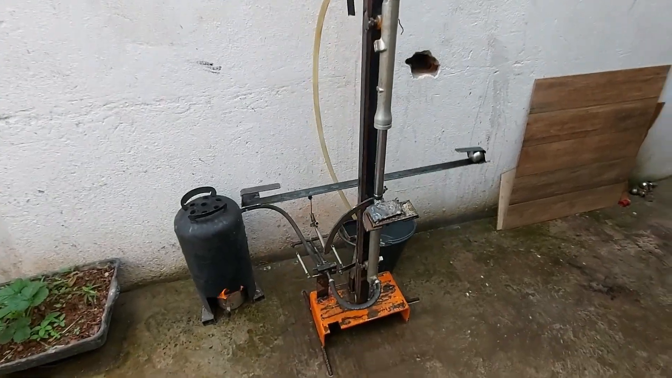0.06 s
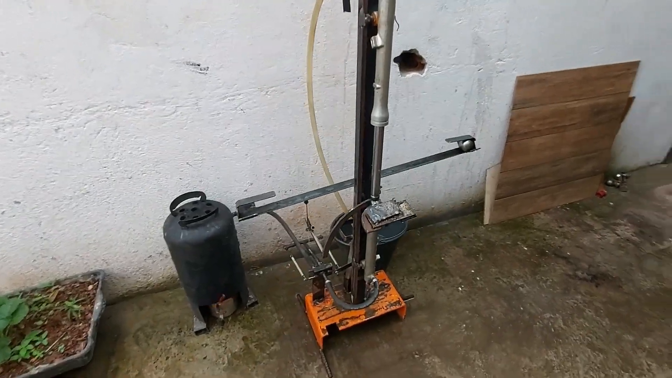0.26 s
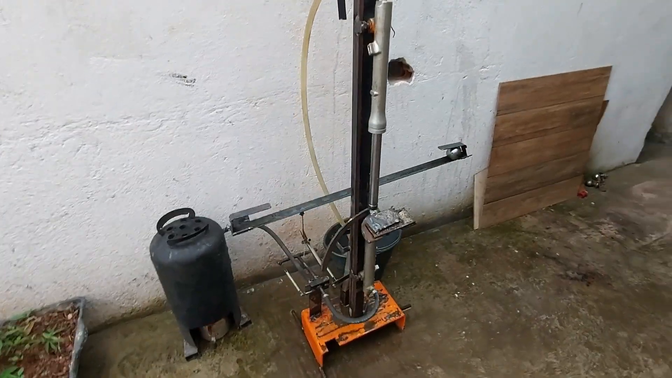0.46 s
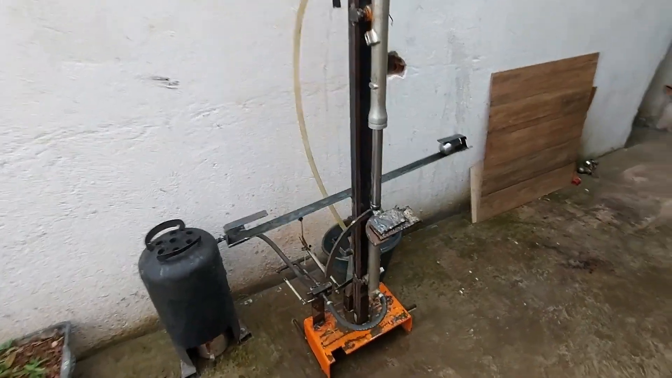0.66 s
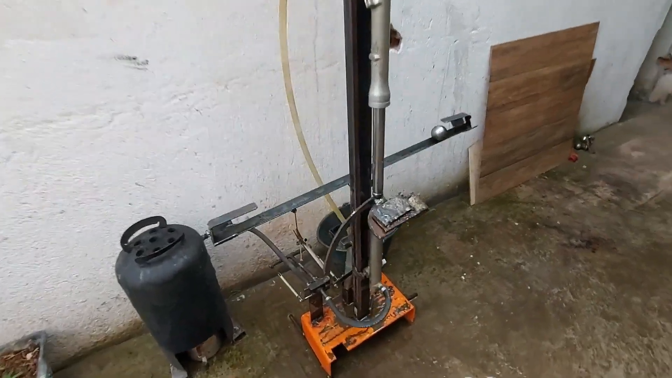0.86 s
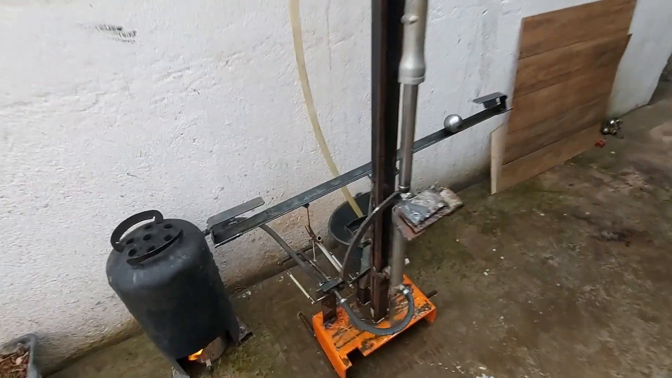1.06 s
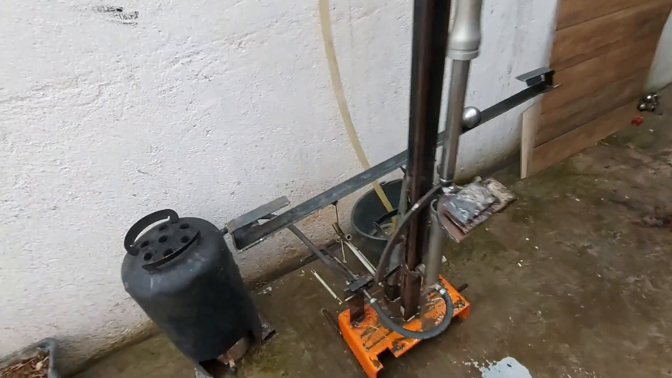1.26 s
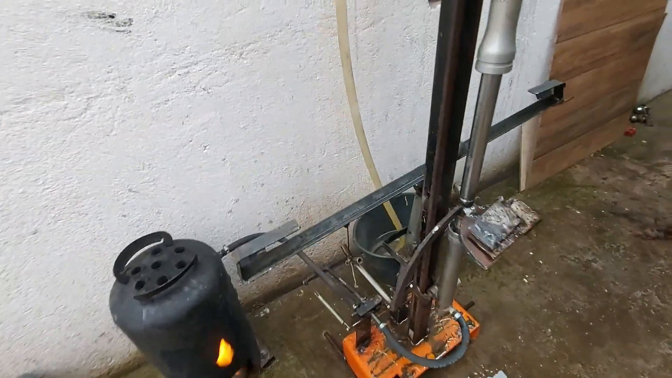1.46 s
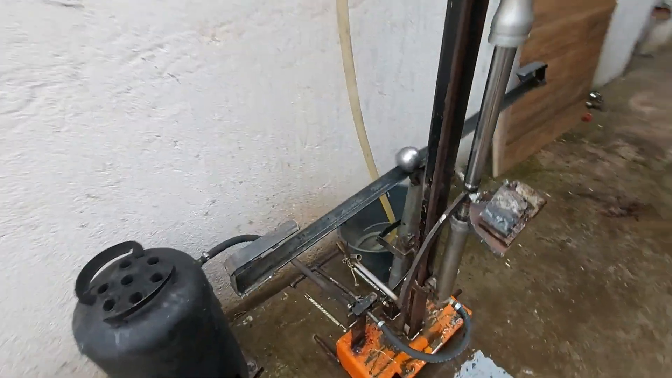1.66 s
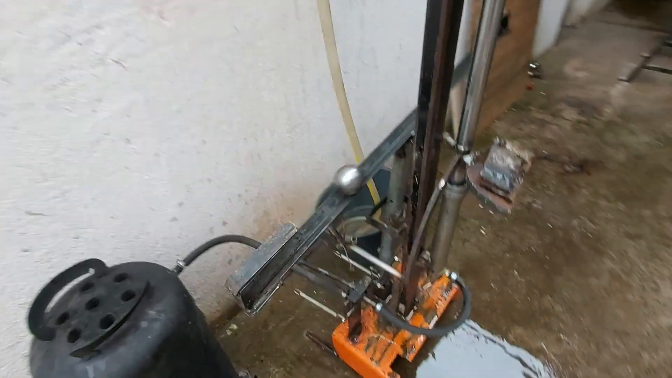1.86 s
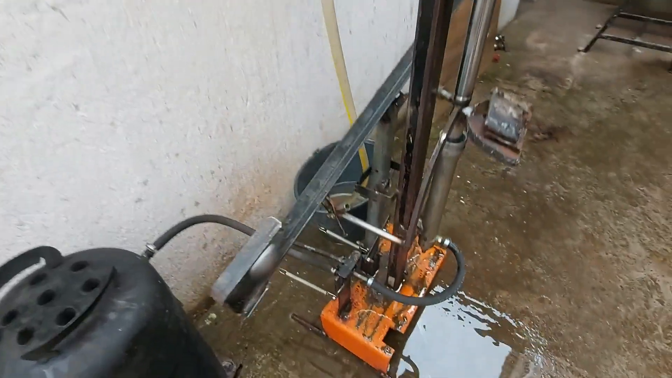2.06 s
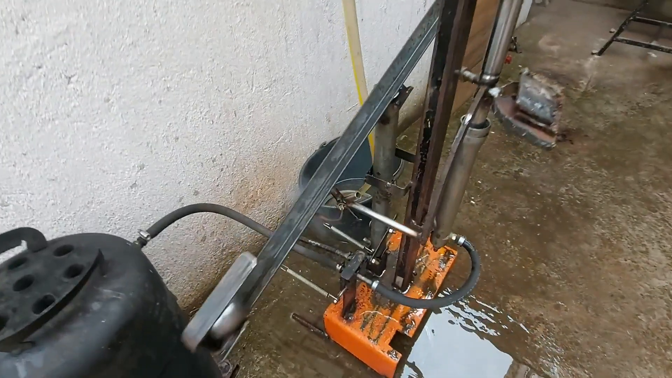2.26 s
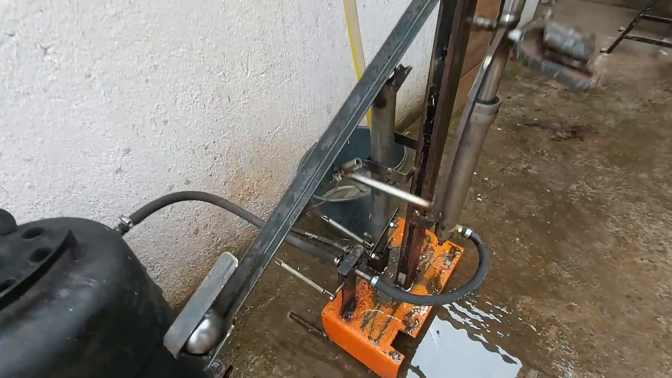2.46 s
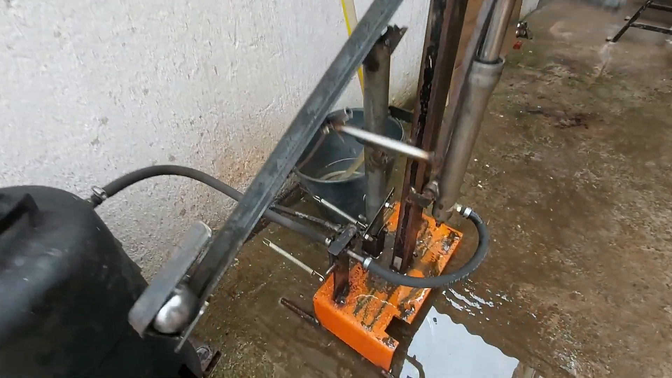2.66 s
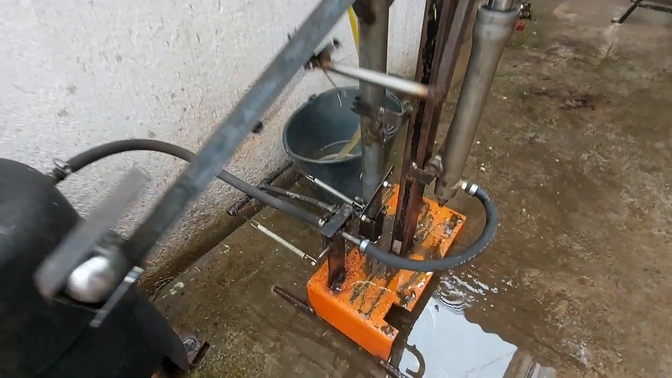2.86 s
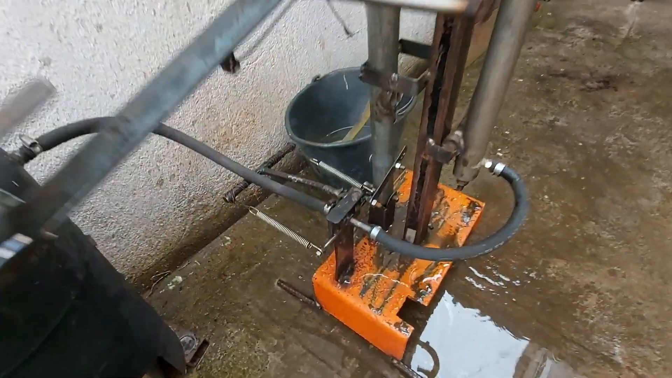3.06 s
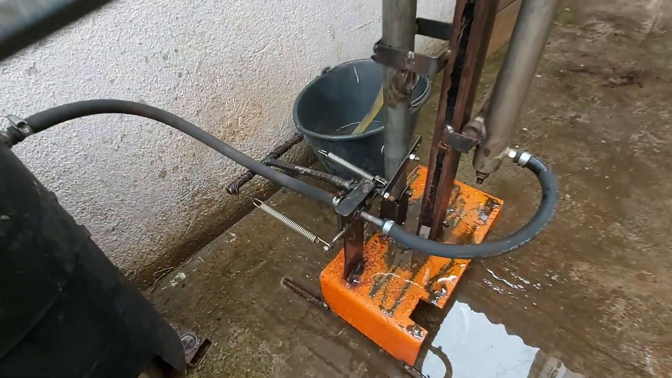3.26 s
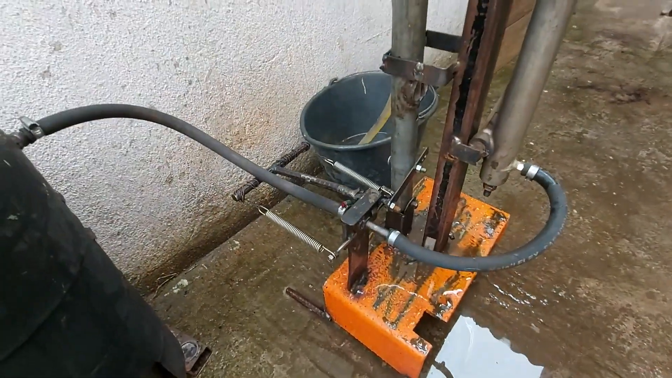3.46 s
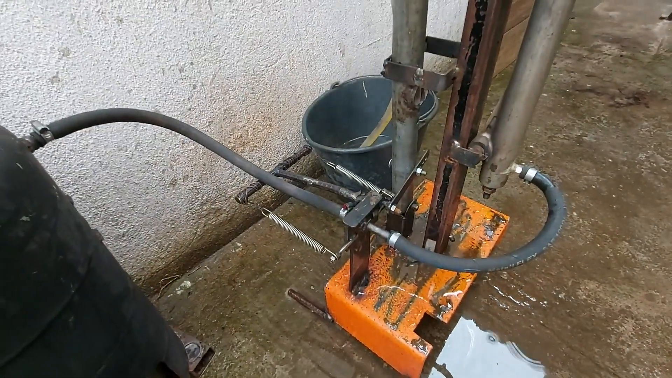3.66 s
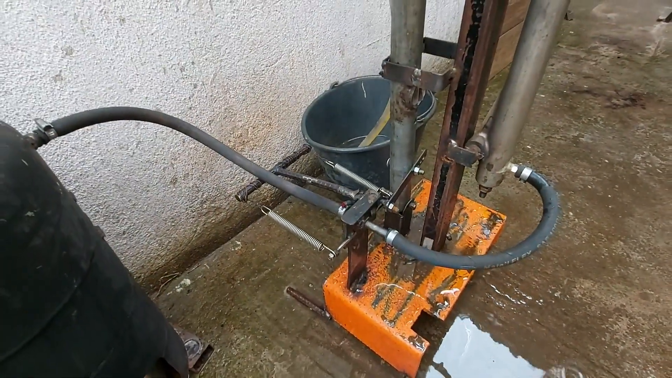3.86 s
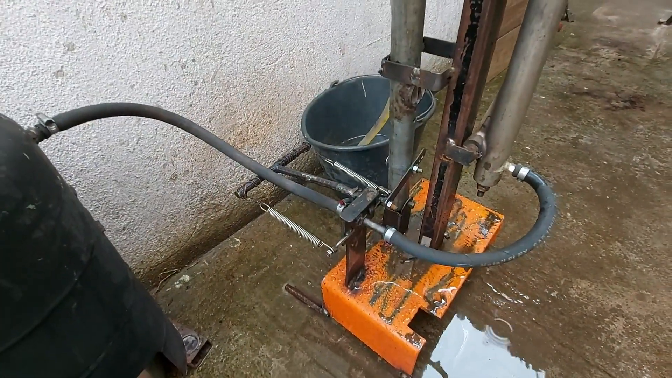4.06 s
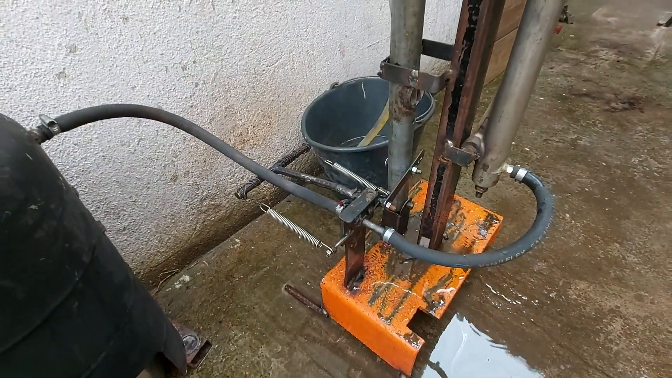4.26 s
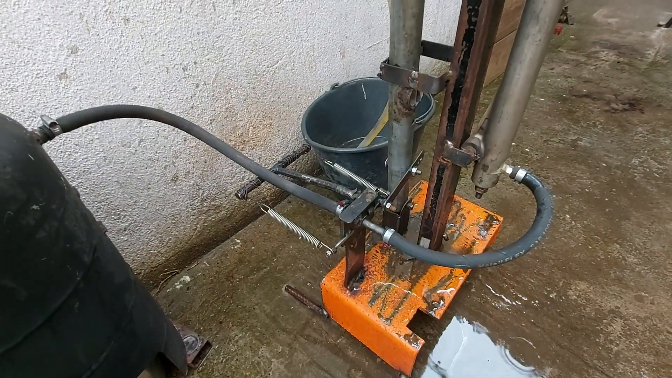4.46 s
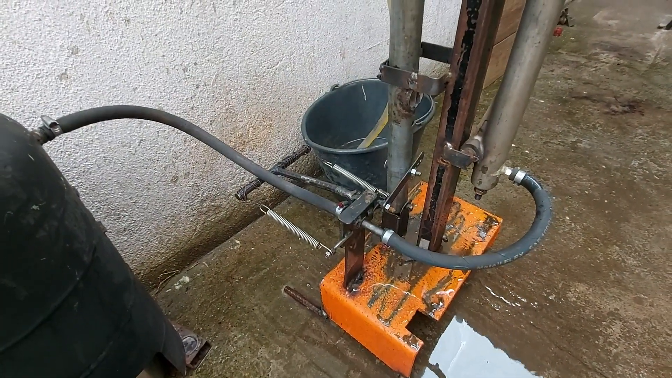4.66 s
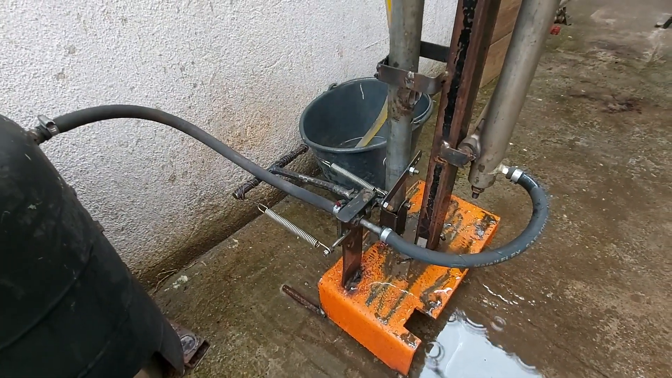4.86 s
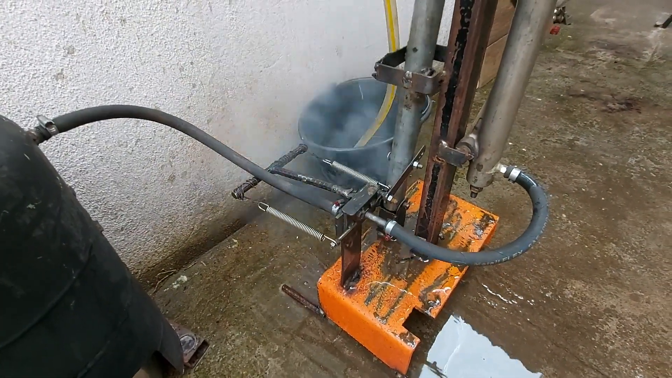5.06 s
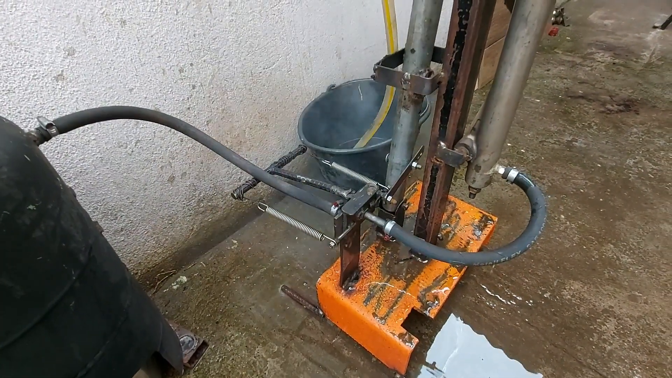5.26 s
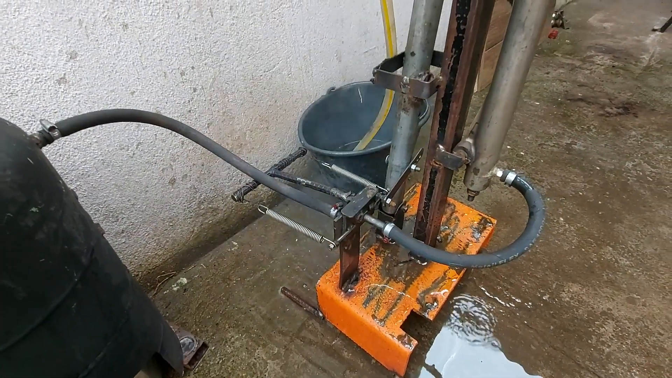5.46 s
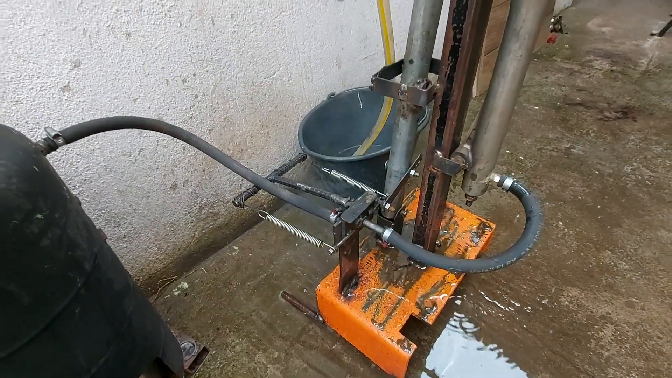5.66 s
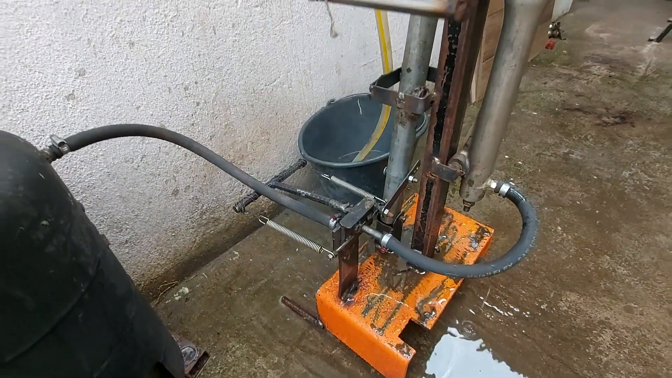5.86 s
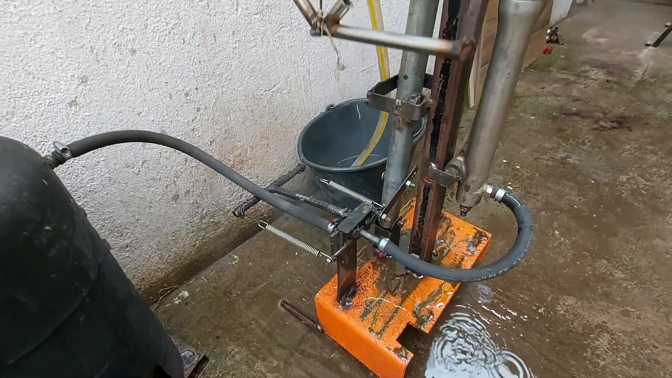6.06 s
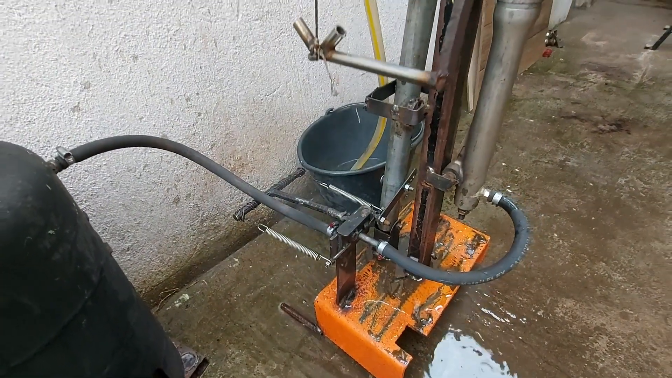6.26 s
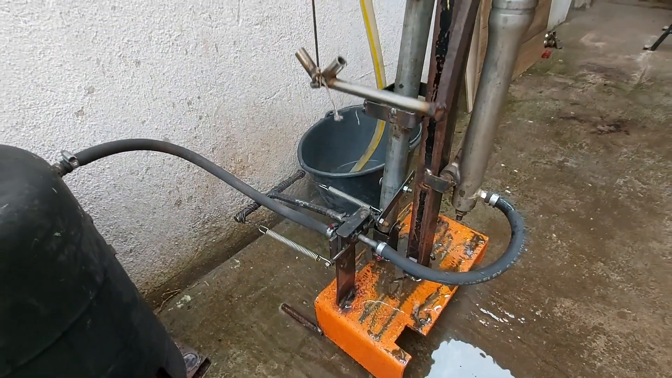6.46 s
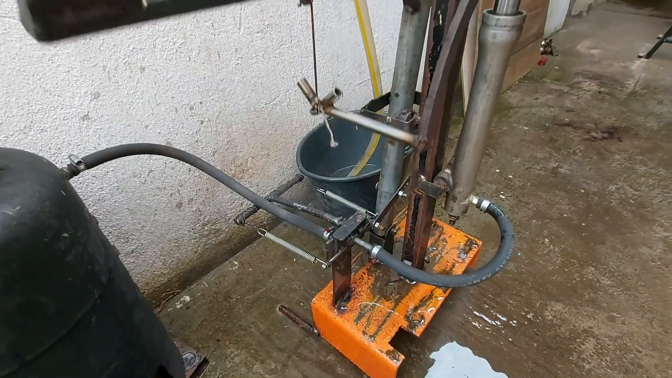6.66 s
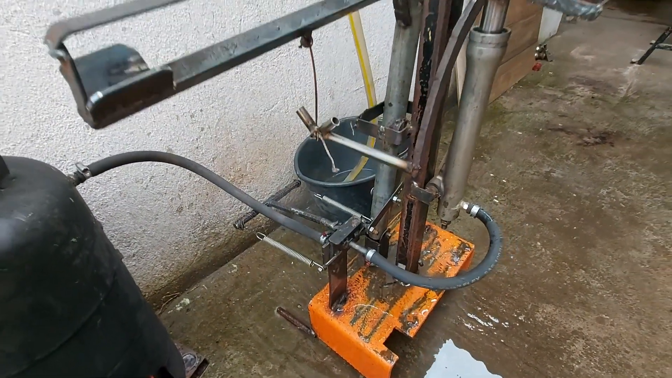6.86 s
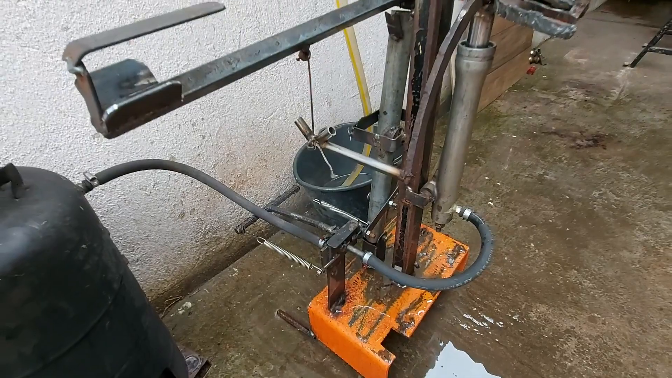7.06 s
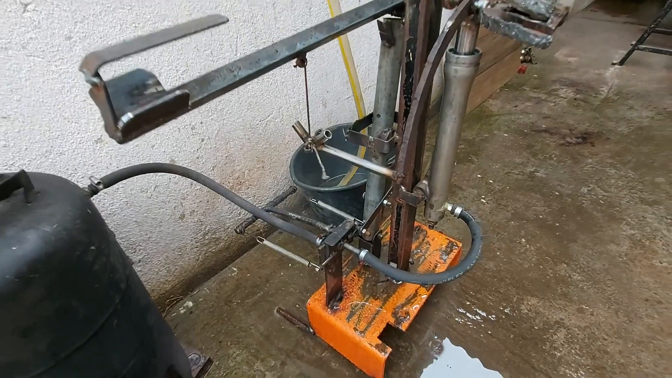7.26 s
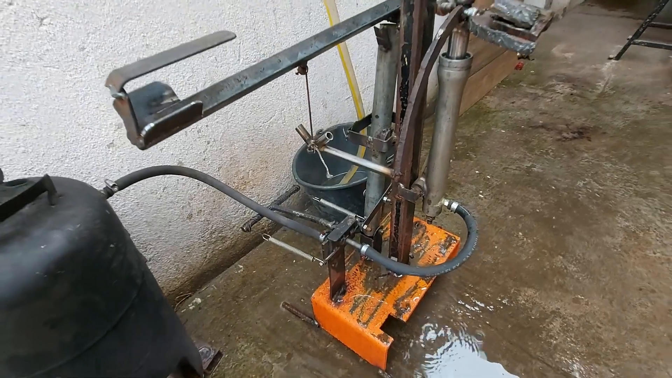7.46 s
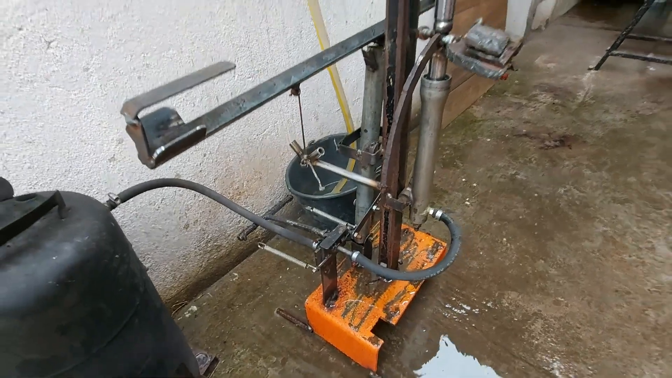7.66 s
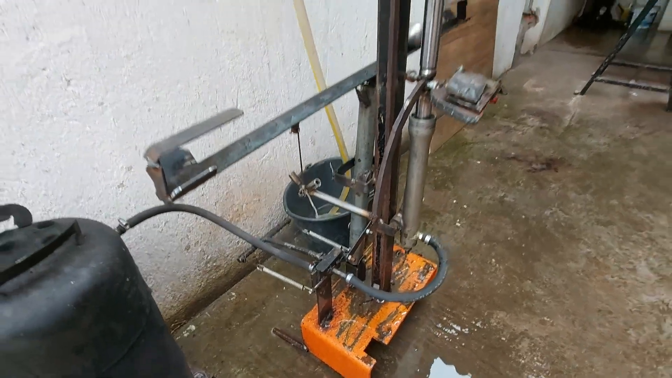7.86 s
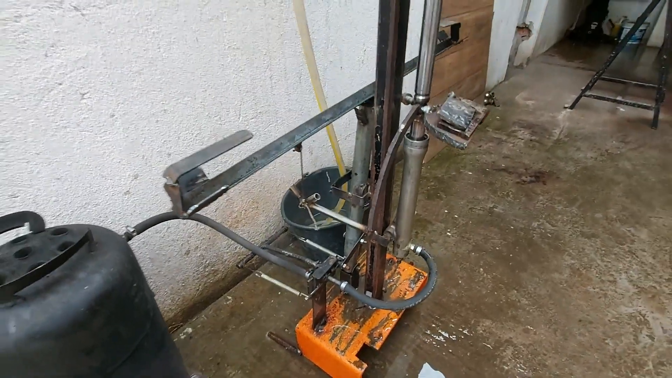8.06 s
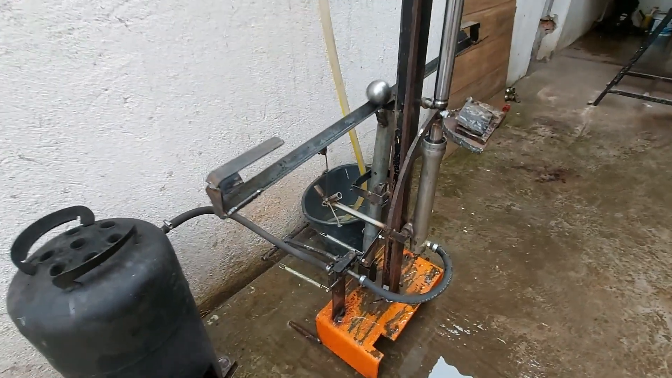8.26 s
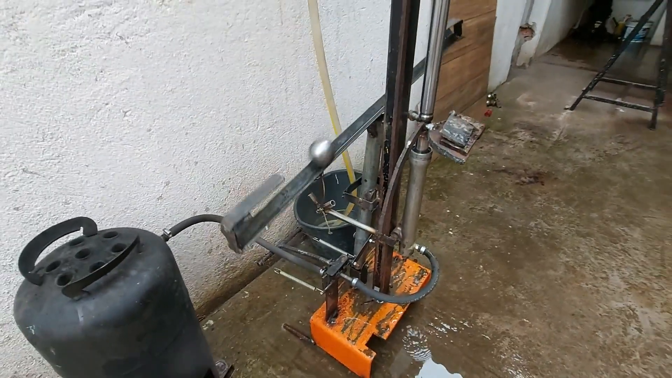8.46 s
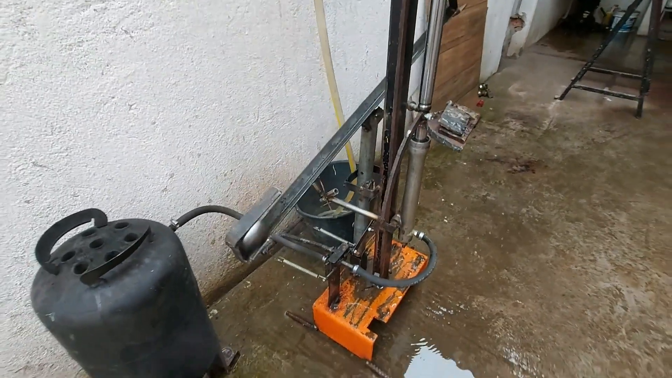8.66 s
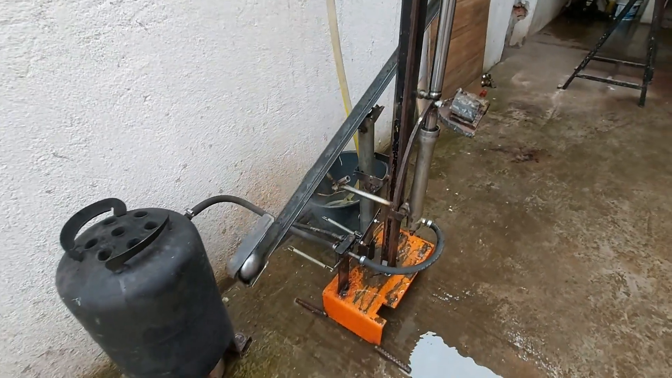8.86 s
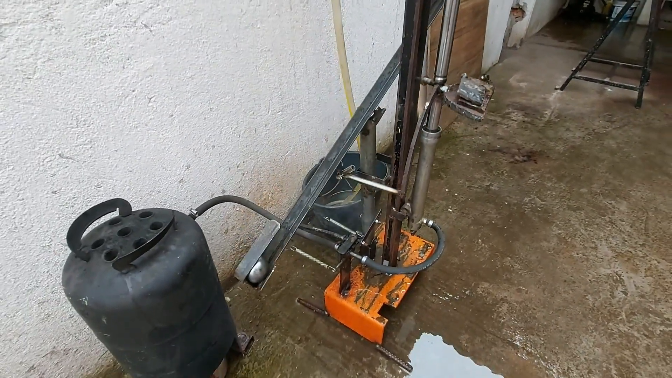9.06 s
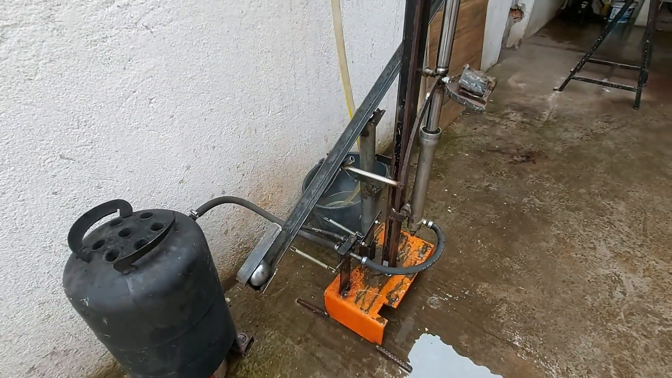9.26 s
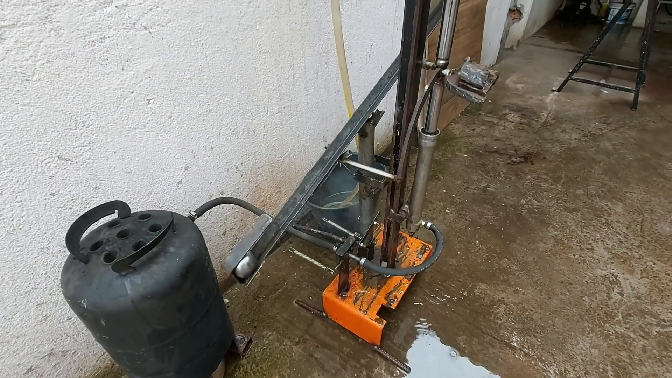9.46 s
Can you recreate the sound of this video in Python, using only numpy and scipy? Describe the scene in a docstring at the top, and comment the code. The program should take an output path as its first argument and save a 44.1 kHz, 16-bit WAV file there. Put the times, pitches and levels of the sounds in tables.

```python
"""A homemade steam pump in a walled yard, heard through a close pair of microphone ports.
The yard, a low drone and leaking steam come first; then the steel beam tips with a clack and a steel ball
rolls along it faster and faster, to clank and rattle in the end cage.
Around the second of three strokes water spatters on wet concrete and the pump wheezes; the beam's end sings
up to an exhaust puff and rings on. The third run rolls and clanks like the others. Walls echo throughout."""
import sys
import numpy as np
from scipy import signal
from scipy.fft import rfft, irfft, next_fast_len
from scipy.io import wavfile
from scipy.ndimage import uniform_filter1d

SR = 44100
rng = np.random.default_rng(int(sys.argv[2]) if len(sys.argv) > 2 else 0)


def waveform_to_disk(signal):
    """Save audio, clipped to [-1, 1], as 16-bit WAV at the path in sys.argv[1]."""
    frames = np.transpose(np.atleast_2d(signal))
    scaled = np.clip(frames, -1, 1) * 32767
    samples = np.round(scaled).astype(np.int16)
    wavfile.write(sys.argv[1], SR, samples)


N = 419391
TIME = np.arange(N) / SR

# Table levels are relative: the functions may trim them. A t60 is the time to fall by 60 dB.
# Brightness tilts the level from one register to the next: low, middle, high.

# Quiet yard around the machine. Each row: frequency in Hz, density in dB per Hz.
YARD_COLOUR = [(15, -14), (25, -17), (49, -17), (161, -3), (200, -19), (293, -11.5), (373, -13.5),
               (1230, -38.5), (1440, 10.5), (1560, 10.5), (4740, -0.5), (8140, -29.5), (16000, -25)]
YARD_DB = -78.5

# Low drone of the frame, swelling as the ball rolls.
# Each row: start in seconds, length in seconds, level near 60 Hz in dB, level near 110 Hz in dB.
DRONES = [(0.54, 1.76, -73.5, -68), (3.698, 1.5, -76.5, -73), (7.397, 1.7, -69, -74)]
DRONE_RISE_S, DRONE_T60_S = 0.24, 2.3

# Steam leaking at the valve. Each row: time in seconds, level in dB.
LEAK = [(0, -66.5), (.24, -67), (2.7, -62), (3.2, -63.5), (3.76, -60), (5.6, -71.5), (6.83, -66),
        (7.8, -61), (9.5, -62)]
# Colour of all the steam. Each row: frequency in Hz, density in dB per Hz.
STEAM_COLOUR = [(300, -5.5), (1000, -10), (2200, -9.5), (2800, -9), (4000, -1), (8000, -7.5), (10000, 1.5),
                (14000, -1.5), (16000, -4)]
# Strokes of the piston. Each row: start in seconds, level of the steam spurts in dB.
STROKES = [(.295, -58.5), (3.83, -52), (6.905, -52.5)]
SPURT_EVERY_S, SPURT_FADE_DB_PER_S = 0.1283, 7
EXHAUST_S, EXHAUST_DB, EXHAUST_RISE_S, EXHAUST_HOLD_S, EXHAUST_T60_S = 4.96, -27, 0.03, 0.04, 0.44

# Steel striking the channel.
# Each row: start in seconds, level in dB, brightness in dB, time rebounding in seconds, chatter t60 in seconds.
KNOCKS = [(.248, -49, -4.5, 0, 0.95), (.289, -38, 1.5, 0.019, 0.3), (0.774, -58.5, -10.5, 0, .26),
          (1.033, -44, -4.5, 0.0081, 0.21), (1.315, -39.5, 1.5, 0.0054, 0.073),
          (2.049, -38, 2.5, 0.038, 0.27), (2.16, -29, 9, 0, 0.12), (2.186, -28.5, -1, 0.0027, 0.083),
          (2.379, -33.5, 7.5, 0.086, 0.21), (2.422, -31, 2.5, 0.0055, .08),
          (2.664, -45.5, 6, 0.00032, 0.065), (2.76, -69, -11, 0.027, 0.17),
          (2.795, -42.5, 5.5, 0.0084, 0.065), (2.97, -59.5, 3, 0, 0.19), (3.005, -66, -12.5, 0.0011, .1),
          (3.779, -45.5, -3.5, 0.032, 0.18), (3.828, -38.5, 3.5, 0.027, 0.1), (4.961, -36, -8, 0, 0.2),
          (5.0, -35.5, -2.5, 0.042, 0.098), (5.121, -32.5, 3, 0.055, 0.49), (5.535, -62, -12, 0.0028, 0.11),
          (5.664, -61.5, -5.5, 0.014, 0.03), (6.847, -43.5, -2.5, 0.02, 0.29),
          (6.887, -32.5, 5, 0.025, 0.24), (7.467, -59.5, -14, 0.0044, 0.25),
          (7.627, -56.5, -5, 0.045, 0.19), (7.847, -41.5, -1.5, 0.053, 0.34),
          (8.121, -40.5, -1, 0.0033, .15), (8.635, -28.5, 3, 0.0057, 0.11), (8.733, -28.5, 5, 0.0039, 0.16),
          (8.758, -38, 1, 0.033, 0.22), (8.954, -32, 8.5, 0.065, 0.16), (9.031, -32.5, 6.5, 0.016, 0.052),
          (9.361, -47, 3.5, 0.0094, 0.051)]
# Strong modes of the channel. Each row: frequency in Hz, width in Hz, level in dB.
RAIL_MODES = [(1477, 30, 4), (1730, 70, -6), (1905, 45, -2), (2890, 110, -5), (3420, 49, 0), (3590, 30, -3),
              (3810, 45, -3), (3920, 48, -6), (4360, 45, 0), (4510, 30, 0), (4940, 63, -1), (5230, 45, -1),
              (5540, 35, -2), (5630, 38, 0), (5960, 60, -4), (6060, 40, -3), (6460, 110, -7),
              (6700, 120, -8), (7030, 86, -8), (7620, 150, -9), (8050, 37, -11), (8380, 28, -8),
              (9030, 35, -5), (9190, 54, 0), (9490, 160, -2), (9780, 48, -3), (9990, 37, -3),
              (10400, 140, -5), (11400, 260, -5), (12000, 33, -4), (12700, 120, -7), (13200, 69, -9),
              (13800, 50, -11), (14200, 49, -8), (15200, 83, -11), (15500, 65, -13)]
# Bending of the whole beam. Each row: frequency in Hz, width in Hz, level in dB.
BEAM_MODES = [(105.8, 0.8, -9.5), (297.7, 22, -5.5), (383, 3.3, 1.5), (4670, 17, -18.5)]
# The channel's many weaker modes. Each row: frequency in Hz, strength in dB.
RAIL_COLOUR = [(60, -22), (200, -17.5), (380, -10), (600, -7.5), (850, -6.5), (1500, -1.5), (1900, -2.5),
               (2450, -7.5), (3000, -4), (4000, -1.5), (5200, -9), (6700, -19.5), (8000, -11.5),
               (10000, -6), (12500, -7), (14000, -14.5), (16000, -22.5)]
# Edges of the low, middle and high register, in Hz.
REGISTER_EDGES_HZ = [0, 2300, 6500, 20000]
MIDDLE_DB = 2.5  # every contact favours the middle register

# Frame jolted by the tipping beam and the ball. Each row: start in seconds, level in dB, hold in seconds.
JOLTS = [(.249, -60, 0.0074), (2.05, -39, 0.021), (3.781, -42, 0.0029), (4.962, -34.5, .005),
         (6.848, -46, 0.004), (8.634, -40, 0.0099)]
# Colour of the jolts. Each row: frequency in Hz, density in dB per Hz.
JOLT_COLOUR = [(25, -13), (160, -6.5), (280, -6.5), (420, 3.5), (800, -5.5), (1100, -8), (2500, -20)]

# Single modes that a blow leaves singing.
# Each row: start in seconds, frequency in Hz, level in dB, time kept up by chatter in seconds, t60 in seconds.
OVERTONES = [(.249, 1915, -50, .02, .2), (.249, 4220, -50, .015, .2), (.29, 1915, -45, .095, .1),
             (2.158, 4508, -41, 0, .45), (2.158, 5630, -37, .012, .1), (2.158, 6066, -39, .012, .1),
             (2.22, 5626, -42, .06, .3), (2.22, 4932, -44, .05, .3), (2.381, 4508, -44, .03, .4),
             (2.381, 6066, -44, .05, .4), (2.381, 9195, -36, 0, .4), (2.381, 11965, -36, 0, .35),
             (2.797, 1750, -54, 0, .25), (2.797, 6600, -47, 0, .13), (3.781, 2400, -48, 0, .25),
             (4.961, 4354, -41, 0, .6), (5.121, 4932, -41, 0, .5), (5.538, 2169, -72, 0, .9),
             (6.848, 382, -59.5, 0, 1.4), (6.89, 1905, -47, 0, .65), (6.89, 3806, -42, .02, .25),
             (6.89, 5669, -41, .02, .22), (6.89, 5970, -41, .02, .24), (7.13, 1476, -58, .02, .3),
             (8.732, 4508, -37, .008, .12), (8.76, 5626, -40, .06, .3), (8.98, 6066, -42, .06, .4),
             (9.03, 3406, -42, .02, .45), (9.03, 382, -60, 0, 1.4)]

# Swells of scraping and rattling contact on the steel.
# Each row: time of the crest in seconds, level in dB, brightness in dB.
SCRAPES = [(.39, -55, 0), (.46, -61, 1), (.94, -55.5, -3.5), (1.21, -43.5, -2.5), (1.395, -41.5, -1),
           (1.636, -45, -2.5), (1.812, -44.5, 4.5), (2.246, -37, 8), (3.958, -45.5, 3), (4.331, -42, 3),
           (4.527, -32.5, 3.5), (4.681, -35, 1.5), (4.776, -42, 2), (4.889, -34.5, 2.5), (7.504, -48, -1.5),
           (7.975, -46, 3.5), (8.239, -41, -1.5), (8.359, -42.5, 1), (8.43, -36, 2), (8.63, -40, -2.5),
           (8.82, -34, 5.5), (9.0, -38.5, 3.5), (9.08, -42.5, 4.5)]
SCRAPE_WIDTH_S = 0.021

# Runs of the ball. Each row: start in seconds, time to reach the cage in seconds, time rattling in it in
# seconds, level at full speed in dB, brightness in dB, rattle level in dB.
ROLLS = [(0.728, 1.463, 0.35, -38.5, -1, -39), (3.82, 1.109, 0.33, -37, 1.5, -40),
         (7.36, 1.28, .5, -44.5, -1.5, -40.5)]
SPEED_POWER, SLOW_DULLS_DB = 1.22, 5  # loudness grows as a power of speed; a slow ball sounds dull
# in the cage the rumble gives way to a bright rattle
RATTLE_BRIGHT_DB, SETTLE_T60_S, HANDOVER_T60_S = 5, 0.34, 0.48

# Ball flying clear of the steel before a hard blow.
# Each row: landing in seconds, time in the air in seconds, gain of its rolling just before landing in dB.
FLIGHTS = [(2.379, 0.026, -8.5), (4.962, .038, -9.5), (5.121, .05, -0.5), (8.953, 0.03, -6)]

# Low blasts at each microphone port in the hardest clanks. Each row: start in seconds, level in dB, hold in seconds.
BLASTS = [(2.184, -31, 0.027), (2.219, -31.5, 0.029), (2.384, -24, 0.0041), (2.408, -29, .005),
          (2.426, -34.5, 0.047), (4.962, -33.5, .005), (4.995, -32.5, 0.017), (5.014, -27, 0.034),
          (5.123, -28, .007), (5.153, -29, 0.021), (8.76, -32, 0.021), (8.78, -31, 0.044),
          (8.982, -32.5, 0.017), (9.032, -29, 0.005)]
# Colour of the blasts. Each row: frequency in Hz, density in dB per Hz.
BLAST_COLOUR = [(25, -11), (55, 1), (110, 0.5), (160, -2), (200, -11), (290, -1.5), (400, -10),
                (650, -10.5), (1000, -17), (2500, -26.5)]

# Water drops slapping the concrete. Each row: start in seconds, level in dB, centre in Hz.
DROPS = [(3.0678, -41.5, 9600), (3.1016, -40, 11100), (3.111, -41, 4340), (3.1343, -37.5, 9400),
         (3.1781, -36.5, 6860), (3.1977, -32.5, 10400), (3.213, -45, 8000), (3.242, -50, 7000),
         (3.2873, -45, 10000), (3.311, -38, 9400), (3.4196, -42, 10600), (3.584, -48.5, 5030),
         (3.62, -46.5, 5100), (3.669, -38.5, 7400), (4.078, -33.5, 10400), (4.118, -28, 9700),
         (4.1678, -27, 10300)]

# Thin wheezy whistles.
# Each row: start in seconds, level in dB, middle pitch in Hz, length in seconds, glide in octaves per second.
WHEEZES = [(3.082, -60, 4160, .18, -1), (3.55, -65, 4020, 0.25, -1), (5.852, -71.5, 4170, 0.15, -1),
           (6.421, -69, 3960, 0.18, -1), (6.626, -71, 4900, .18, -.5), (7.165, -59, 4780, 0.093, 1.5),
           (7.185, -57.5, 4070, .24, -1)]

# Far end of the beam, singing up during the second run and then ringing on.
RING_HZ, RING_PEAK_S, RING_DB, RING_RISE_DB_PER_S, RING_T60_S = 1476, 5.08, -45.5, 16, 2.1

# Echo of the yard walls. Each row: frequency in Hz, t60 in seconds.
ECHO = [(100, 1), (400, 0.26), (1400, 0.78), (4000, 0.5), (8000, 0.4), (15000, 0.097)]
# Direction of the machine from the microphone. Each row: time in seconds, left minus right in dB.
BEARING = [(0, 2), (2.3, 2), (3.8, 5), (6.9, 2.5), (7.5, 3), (9, 3)]
# Close ports hear long waves alike. Each row: frequency in Hz, weight of their difference in dB.
WIDTH = [(60, -10), (400, -12), (800, -7), (1150, 0.5), (1500, 2.5), (2000, -2.5), (3000, -0.5), (16000, 0)]
# Unequal colour of the two ports. Each row: frequency in Hz, left minus right in dB.
PORTS = [(60, 0.5), (110, -1), (200, 1), (380, -1.5), (700, 1), (1290, -5), (2380, 0.5), (4400, -5),
         (8120, -1.5), (15000, -3)]
EDGE_HZ = 15900  # upper limit of the microphone's band


def gain_of(db):
    """Decibels to amplitude."""
    return 10 ** (np.asarray(db) / 20)


def evened(x):
    """Scales to an rms of one."""
    return x / np.sqrt(np.mean(x ** 2) + 1e-20)


def read(points, hz):
    """Reads a table on a log-frequency axis."""
    f, value = np.transpose(points)
    return np.interp(np.log(hz + 1), np.log(f + 1), value)


def level(rows):
    """Amplitude over time from a curve of seconds and dB."""
    return gain_of(np.interp(TIME, *np.transpose(rows)))


def swell(start, rise_s, hold_s, t60):
    """An envelope over the whole scene: a straight rise, full until hold_s after the start, then a decay."""
    t = TIME - start
    rise = np.clip(t / rise_s, 0, 1)
    return rise * gain_of(-60 * np.clip((t - hold_s) / t60, 0, 4))


def panned(db):
    """Left and right gains for a level difference."""
    return gain_of(np.array([[.5], [-.5]]) * db)


def add(mix, s, sound):
    """Mixes a sound in at a time."""
    part = mix[..., max(round(s * SR), 0):][..., :sound.shape[-1]]
    part += sound[..., :part.shape[-1]]


def noise(colour, shared):
    """Two channels of coloured noise with a share of their power in common."""
    size = next_fast_len(N, True)
    white = rng.standard_normal((3, size))
    pair = np.sqrt(shared) * white[2] + np.sqrt(1 - shared) * white[:2]
    weights = gain_of(read(colour, np.fft.rfftfreq(size, 1 / SR)))
    return evened(irfft(rfft(pair) * weights, size)[:, :N])


def band_noise(hz, width, size):
    """A short stretch of stereo noise in one resonance."""
    b, a = signal.iirpeak(hz, hz / width, fs=SR)
    return evened(signal.lfilter(b, a, rng.standard_normal((2, size))))


def slow_wander(first, second):
    """Noise smoothed by two running means, of so many samples each."""
    return evened(uniform_filter1d(uniform_filter1d(rng.standard_normal(N), size=first), size=second))


def yard_air():
    """The steady noise floor of the quiet yard."""
    return gain_of(YARD_DB) * noise(YARD_COLOUR, shared=0.17)


def drone(low_hz=61, high_hz=108, idle_db=-84, skirt_db=-13):
    """Two low resonances of the frame hum faintly and swell as the ball rolls."""
    drive = np.zeros((2, N))
    for s, length, *drones_db in DRONES:
        drive += gain_of(drones_db)[:, None] * swell(s, DRONE_RISE_S, length, DRONE_T60_S)
    out = np.zeros((2, N))
    for size, hz in zip(drive, (low_hz, high_hz)):
        hump = [(hz / 4, -60), (hz / 1.2, skirt_db), (hz, 0), (hz * 1.1, skirt_db), (hz * 4, -33), (hz * 20, -70)]
        out += np.hypot(gain_of(idle_db), size) * noise(hump, shared=0.29)
    return out


def steam(count=7):
    """Turbulent hiss of a leak that spurts evenly during each stroke, and of one exhaust puff."""
    puff = gain_of(EXHAUST_DB) * swell(EXHAUST_S, EXHAUST_RISE_S, EXHAUST_HOLD_S, EXHAUST_T60_S)
    flow = level(LEAK) + puff
    t = np.arange(0, count * SPURT_EVERY_S, 1 / SR)
    spurts = np.sin(np.pi * t / SPURT_EVERY_S) ** 2 * gain_of(-SPURT_FADE_DB_PER_S * t)
    for s, db in STROKES:
        add(flow, s + SPURT_EVERY_S / 2, gain_of(db) * spurts)
    return flow * noise(STEAM_COLOUR, shared=0.047)


def register_db(order, bright_db):
    """Level of the low, middle or high register (order 0, 1, 2) for a contact of some brightness."""
    return bright_db * (order - 1) - MIDDLE_DB * abs(order - 1)


def add_knocks(power, order, knock_db=-2.5, bite=0.76, bite_s=0.0066, rise_s=0.00033):
    """Blows on the channel add contact power that bites at once and then chatters away."""
    t = np.arange(SR // 2) / SR
    attack = np.minimum(t / rise_s, 1) * (1 + bite * np.exp(-t / bite_s))
    for s, db, bright_db, rebound_s, t60 in KNOCKS:
        fade_db = -60 * np.maximum(t - rebound_s, 0) / max(t60, .01)
        peak_db = db + knock_db + register_db(order, bright_db)
        add(power, s, (attack * gain_of(peak_db + fade_db)) ** 2)


def cracks(crack_db=1, rebound_db=-3, rebound_every_s=0.022):
    """The first touch of each blow lasts about a millisecond; long rebounds touch again."""
    out = np.zeros(N)
    for s, db, _, rebound_s, _ in KNOCKS:
        for k, touch in enumerate(rng.choice([-1, 1], size=(4, 48))):
            if k == 0 or k * rebound_every_s <= rebound_s:
                add(out, s + k * rebound_every_s, gain_of(db + crack_db + rebound_db * (k > 0)) * touch)
    return out


def rail_responses(dense_t60=0.07, count=4):
    """The channel's ring from a few contact points: strong modes over a short, dense clatter, by register."""
    t = np.arange(SR // 2) / SR
    bins = np.fft.rfftfreq(len(t), 1 / SR)
    hz, width, db = np.vstack([RAIL_MODES, BEAM_MODES]).T
    phases = np.exp(2j * np.pi * rng.random((count, 2, len(hz))))
    weights = gain_of(db) * 2 * np.pi * width / SR * phases
    # a wider mode dies sooner
    modes = rfft((weights @ np.exp(np.outer(2j * np.pi * hz - np.pi * width, t))).real)
    fade = gain_of(-60 * t / dense_t60)
    dense = rng.standard_normal((count, 2, len(t))) * fade
    # overlapping modes leave no deep gaps between them
    dense = irfft(np.exp(1j * np.angle(rfft(dense))), len(t)) * np.sqrt(fade)
    dense = rfft(dense / np.linalg.norm(dense, axis=-1, keepdims=True)) * gain_of(read(RAIL_COLOUR, bins))
    # fades out over the fourth fifth; the last fifth is silent
    whole = irfft(modes + dense, len(t)) * np.clip(4 - 5 * t / t[-1], 0, 1)
    responses = []
    for lo, hi in zip(REGISTER_EDGES_HZ, REGISTER_EDGES_HZ[1:]):
        sos = signal.butter(4, [lo + 40, hi], "band", fs=SR, output="sos")
        responses.append(evened(signal.sosfilt(sos, whole)) / np.sqrt(len(t)))
    return responses


def thuds(blows, colour, lowest_hz, fall_t60, thud_db, ragged_db):
    """Short bursts of low, shuddering noise, in gusts where ragged_db is above zero."""
    out, t = np.zeros((2, N)), np.arange(SR // 6) / SR
    sos = signal.butter(2, lowest_hz, "high", fs=SR, output="sos")
    shudder = signal.sosfilt(sos, noise(colour, shared=0))
    shudder = shudder * gain_of(ragged_db * slow_wander(260, 90))
    for s, db, hold_s in blows:
        shape = gain_of(-60 * np.maximum(t - hold_s, 0) / fall_t60)
        burst = shape * shudder[:, round(s * SR):][:, :len(t)]
        add(out, s, gain_of(db + thud_db) * evened(burst) * np.sqrt(np.mean(shape ** 2)))
    return out


def frame_jolts():
    """The frame shudders as it is jolted by the tipping beam and the ball."""
    return thuds(JOLTS, JOLT_COLOUR, lowest_hz=250, fall_t60=.1, thud_db=1, ragged_db=0)


def overtones(sing_db=1.4, waver_rad=0.62):
    """Lightly damped modes outlast the clatter, with a phase that wavers as the steel rattles on."""
    out, t = np.zeros((2, N)), np.arange(SR) / SR
    window = np.hanning(SR // 40)[None]
    for s, hz, db, hold_s, t60 in OVERTONES:
        waver = evened(signal.oaconvolve(rng.standard_normal((2, SR)), window, "same", axes=1))
        fade_db = -60 * np.maximum(t - hold_s, 0) / t60
        shape = np.minimum(t / .003, 1) * gain_of(db + sing_db + fade_db)
        add(out, s, shape * np.sin(2 * np.pi * hz * t + waver_rad * waver))
    return out


def add_scrapes(power, order, scrape_db=1.77):
    """Scraping and rattling on the steel adds contact power that swells and ebbs."""
    t = np.arange(SR // 2) / SR
    crest = np.exp(-((t - t.mean()) / SCRAPE_WIDTH_S) ** 2)
    for s, db, bright_db in SCRAPES:
        gain = gain_of(db + scrape_db + register_db(order, bright_db))
        add(power, s - t.mean(), crest * gain ** 2)


def rolling(order):
    """The ball speeds up evenly, growing louder and brighter, then rattles in the cage and settles."""
    power, t = np.zeros(N), np.arange(3 * SR) / SR
    for s, travel_s, rattle_s, db, bright_db, rattle_db in ROLLS:
        speed = np.minimum(t / travel_s, 1)
        caged_s = np.maximum(t - travel_s, 0)
        fade_db = -60 * caged_s / HANDOVER_T60_S
        settle_db = -60 * np.maximum(caged_s - rattle_s, 0) / SETTLE_T60_S
        tone_db = register_db(order, bright_db - SLOW_DULLS_DB * (1 - speed))
        rumble = speed ** SPEED_POWER * gain_of(db + fade_db + tone_db)
        rattle_tone_db = register_db(order, RATTLE_BRIGHT_DB)
        rattle = (caged_s > 0) * gain_of(rattle_db + settle_db + rattle_tone_db)
        add(power, s, rumble ** 2 + rattle ** 2)
    return np.sqrt(power)


def airborne():
    """Gain of the rolling contact: it drops while the ball flies towards a hard blow."""
    db = np.zeros(N)
    for s, flight_s, left_db in FLIGHTS:
        add(db, s - flight_s, left_db * np.sqrt(np.linspace(0, 1, int(flight_s * SR))))
    return gain_of(db)


def contact(order, grip):
    """Contact force over time in one register: rolling, knocks and scrapes add as powers."""
    power = (rolling(order) * grip) ** 2
    add_knocks(power, order)
    add_scrapes(power, order)
    return np.sqrt(power)


def ball(hits_per_s=2000, bumpy_db=2.0, travel_hz=2.7):
    """Tiny impacts on rough steel ring the channel; the contact moves among a few points along it."""
    impacts = evened(rng.choice([-1, 1], N) * (rng.random(N) < hits_per_s / SR))
    grip = gain_of(bumpy_db * slow_wander(400, 150)) * airborne()
    touches, out = cracks(), np.zeros((2, N))
    for order, points in enumerate(rail_responses()):
        force = impacts * contact(order, grip) + touches
        for k, response in enumerate(points):
            nearness = np.cos(np.pi * (travel_hz * TIME + k / len(points))) * np.sqrt(2 / len(points))
            out += signal.oaconvolve((force * nearness)[None], response, axes=1)[:, :N]
    return out


def standing_waves(x, half_waves=3.424, depth_db=1.0):
    """The rolling ball crosses the nodes of the beam's bending waves, so its colour keeps shifting."""
    hz, t, z = signal.stft(x, SR, nperseg=1024)
    # whole runs completed, plus the share of the beam covered in this one
    place = sum(np.clip((t - s) / travel_s, 0, 1) ** 2 for s, travel_s, *_ in ROLLS)
    # half_waves is the count at 1 kHz; bending waves shorten as the root of frequency
    ripple = np.cos(2 * np.pi * half_waves * np.sqrt(hz / 1000)[:, None] * (place % 1))
    depth = depth_db * np.sqrt(abs(np.sin(np.pi * place)))
    return signal.istft(z * gain_of(depth * ripple), SR, nperseg=1024)[1][:, :N]


def port_blasts():
    """The hardest clanks buffet each microphone port on its own with ragged low noise."""
    blasts = thuds(BLASTS, BLAST_COLOUR, lowest_hz=43.7, fall_t60=.075, thud_db=0.5, ragged_db=1.5)
    return blasts * panned(0.93)


def drops(drop_db=-4, slap_t60=0.016, spray_db=-21, spray_t60=0.88,
          splat_db=-9, splat_hz=2900, splat_t60=0.012, side_db=-0.5):
    """Each drop is a short slap and a duller splat, followed by fine spray."""
    out, t = np.zeros((2, N)), np.arange(SR // 10) / SR
    slap_and_spray = gain_of(-60 * t / slap_t60) + gain_of(spray_db - 60 * t / spray_t60)
    splat = gain_of(splat_db - 60 * t / splat_t60)
    for s, db, hz in DROPS:
        bright = slap_and_spray * band_noise(hz, width=4300, size=len(t))
        dull = splat * band_noise(splat_hz, width=2700, size=len(t))
        add(out, s, gain_of(db + drop_db) * (bright + dull))
    return out * panned(side_db)


def wheezes(width_hz=380):
    """Thin, breathy squeaks of the pump: narrow noise turned up to a gliding pitch."""
    out = np.zeros((2, N))
    sos = signal.butter(1, width_hz / 2, fs=SR, output="sos")
    for s, db, hz, length, glide in WHEEZES:
        t = np.arange(int(length * SR)) / SR
        pitch = hz * 2 ** (glide * (t - length / 2))
        turn = np.exp(2j * np.pi * np.cumsum(pitch) / SR)
        blur = signal.sosfilt(sos, rng.standard_normal((2, SR // 2, 2)) @ [1, 1j])
        squeak = evened((blur[:, :len(t)] * turn).real)
        add(out, s, gain_of(db) * np.hanning(len(t)) * squeak)
    return out


def ring(beat_hz=4.9, twin_db=-13, side_db=-2):
    """A close pair of lightly damped modes builds up as the ball rolls and sings on after its peak."""
    t = TIME - RING_PEAK_S
    rise_or_fall_db = np.minimum(RING_RISE_DB_PER_S * t, -60 * t / RING_T60_S)
    shape = (TIME > ROLLS[1][0]) * gain_of(RING_DB + rise_or_fall_db)
    phase = 2 * np.pi * (RING_HZ * TIME + np.array([[0], [.25]]))  # right a quarter cycle ahead
    twin = gain_of(twin_db) * np.sin(phase + 2 * np.pi * beat_hz * TIME)
    return panned(side_db) * shape * evened(np.sin(phase) + twin)


def walls(x, first_s=0.0072):
    """Reflections between the yard walls start after first_s; each band dies at its own speed."""
    taps = rng.standard_normal((2, SR)) * np.clip(np.arange(SR) / SR / first_s - 1, 0, 1)
    hz, t, z = signal.stft(taps, SR, nperseg=256)
    tail = signal.istft(z * gain_of(-60 * t / read(ECHO, hz)[:, None]), SR, nperseg=256)[1]
    return signal.oaconvolve(x, tail / np.linalg.norm(tail[0]), axes=1)[:, :N]


def close_ports(x):
    """Ports a short way apart: trades the channels' difference for their sum by band, at equal power."""
    size = next_fast_len(N, True)
    left, right = rfft(x, size)
    width = gain_of(read(WIDTH, np.fft.rfftfreq(size, 1 / SR)))
    mid, side = left + right, (left - right) * width
    return irfft(np.array([mid + side, mid - side]) / np.sqrt(2 * (1 + width ** 2)), size)[:, :N]


def scene(wet_db=-11):
    """The machine, its echo and the quiet yard at the microphone."""
    bearing = panned(np.interp(TIME, *np.transpose(BEARING)))
    steel = standing_waves(ball()) + overtones() + frame_jolts()
    machine = (steel + steam() + wheezes()) * bearing + drops()
    echo = gain_of(wet_db) * walls(machine)
    return close_ports(machine + echo + ring() + drone() + yard_air()) + port_blasts()


def record(dry):
    """The two microphone ports colour the sound differently; then the band limit."""
    size = next_fast_len(N + 2000, True)
    colour = panned(read(PORTS, np.fft.rfftfreq(size, 1 / SR)))
    heard = irfft(rfft(dry, size) * colour, size)[:, :N]
    low_pass = signal.firwin(511, EDGE_HZ, window=("kaiser", 9), fs=SR)
    return signal.oaconvolve(heard, low_pass[None], "same")


dry = scene()
out = record(dry)
waveform_to_disk(out)
```